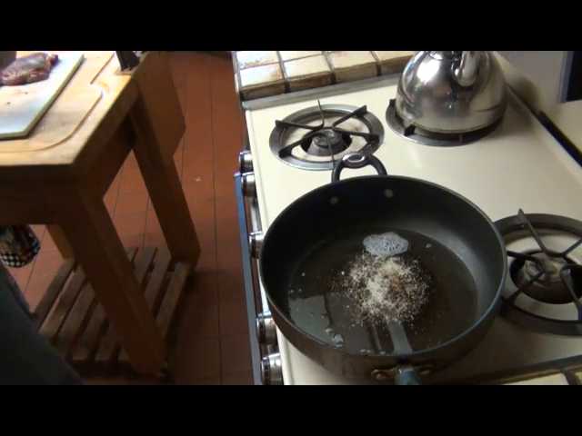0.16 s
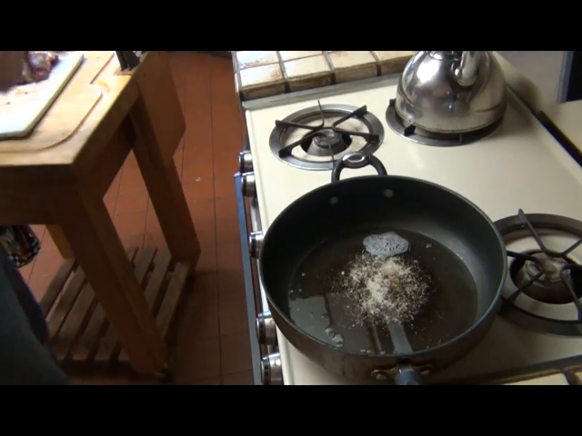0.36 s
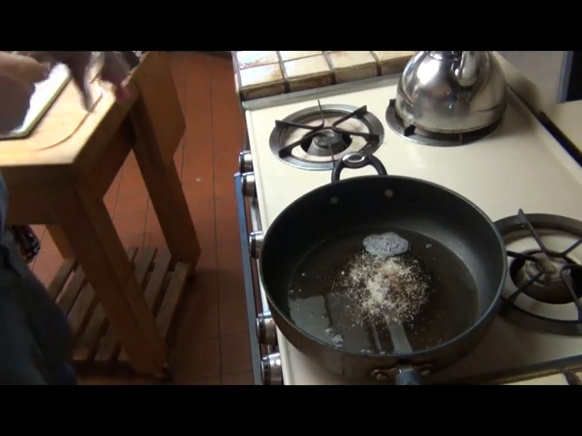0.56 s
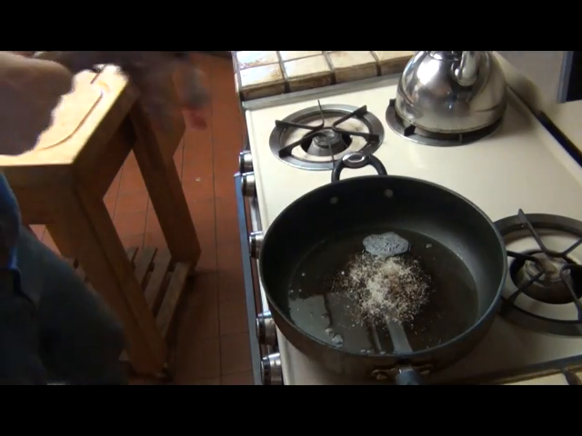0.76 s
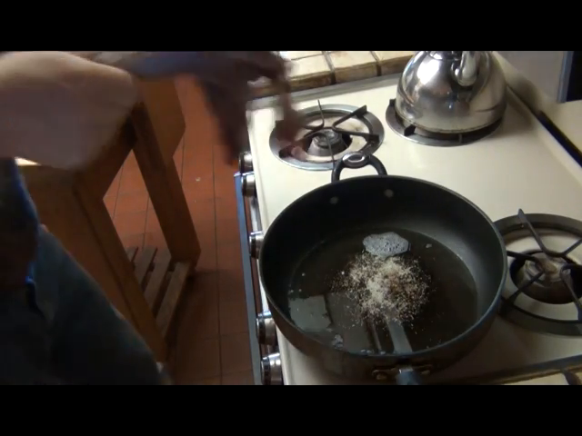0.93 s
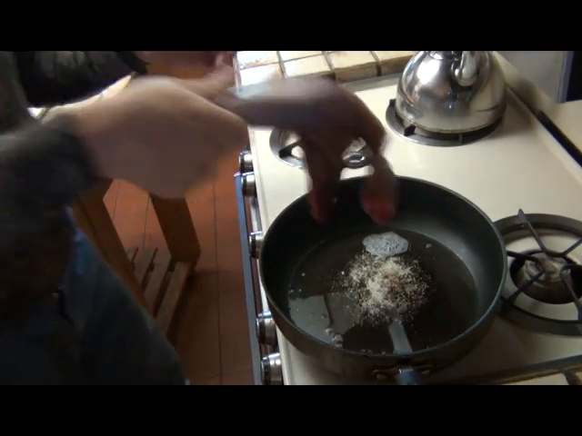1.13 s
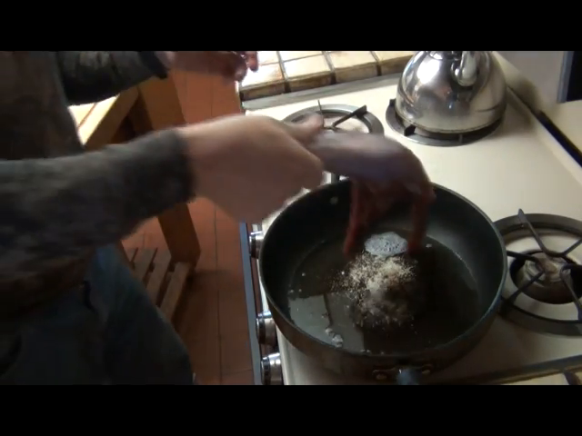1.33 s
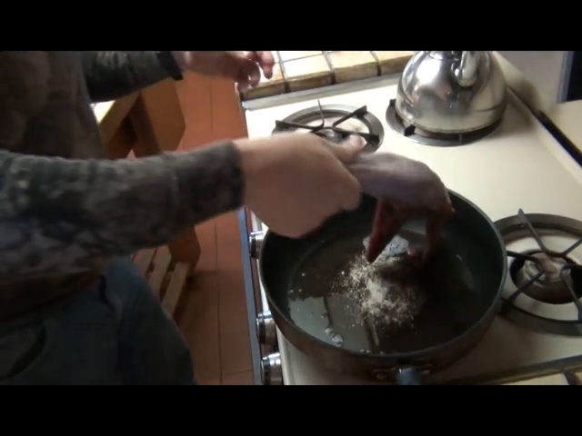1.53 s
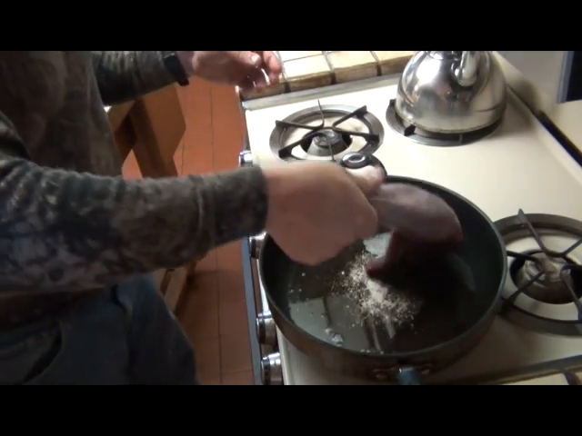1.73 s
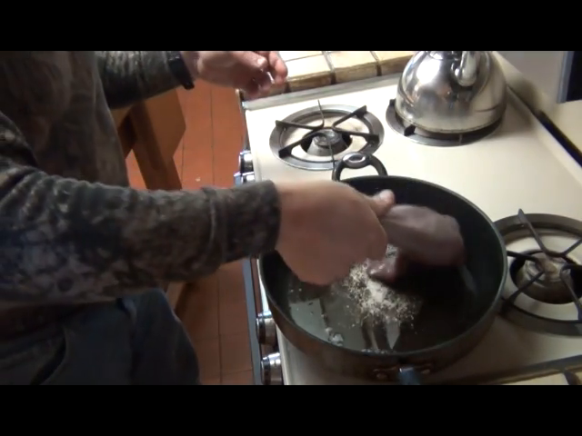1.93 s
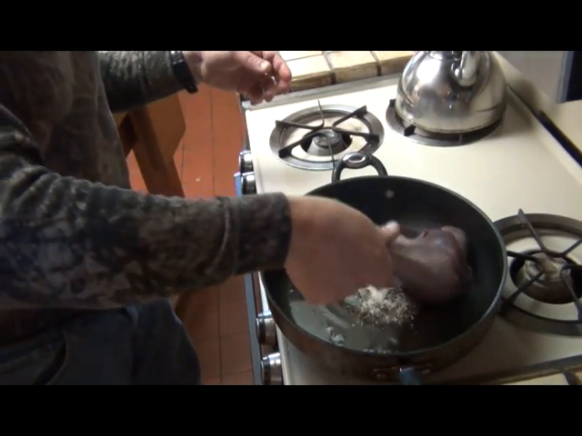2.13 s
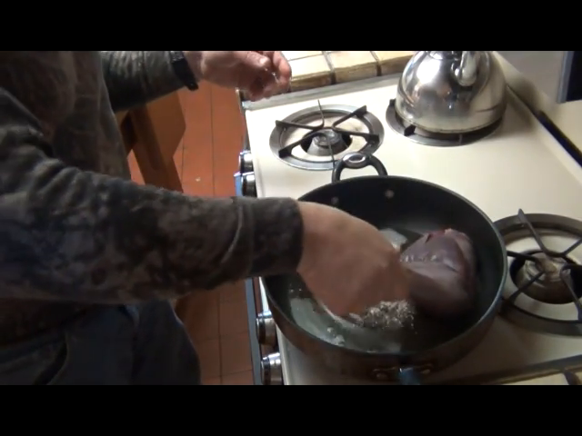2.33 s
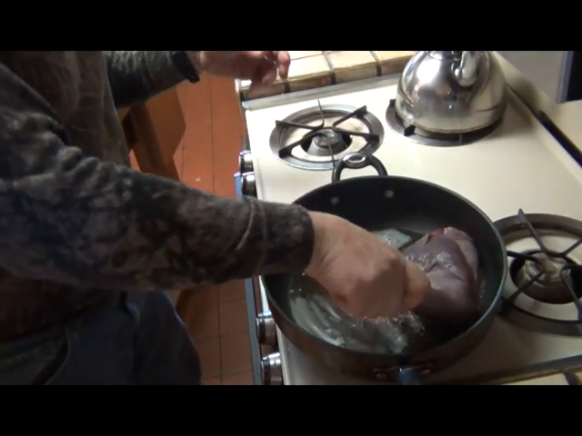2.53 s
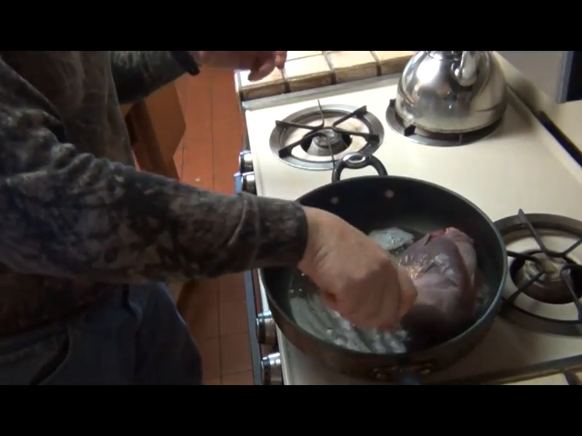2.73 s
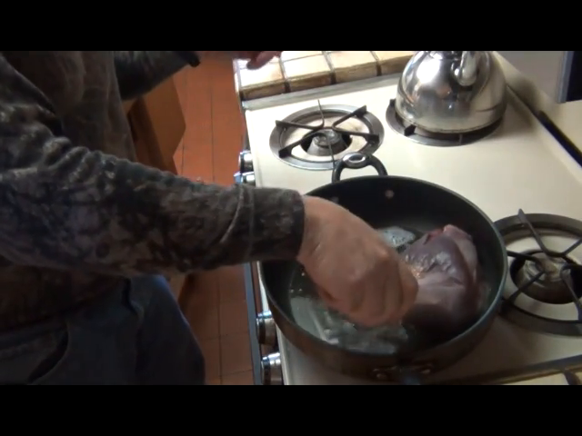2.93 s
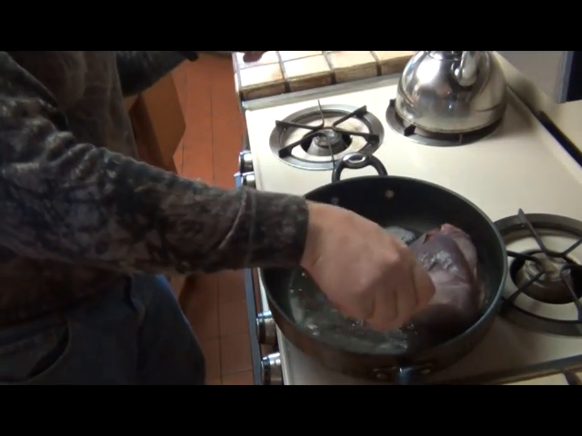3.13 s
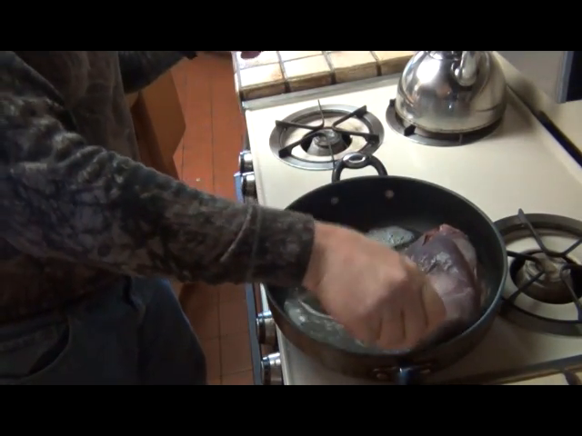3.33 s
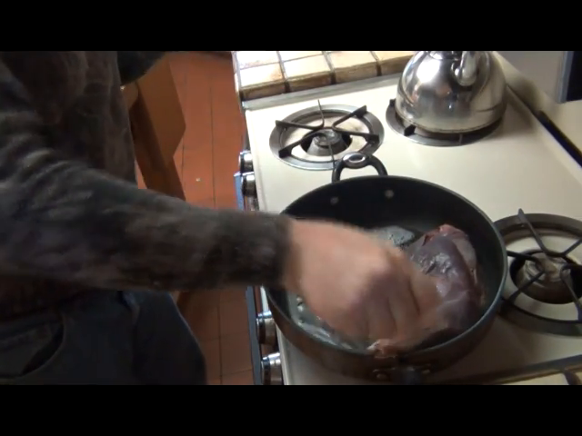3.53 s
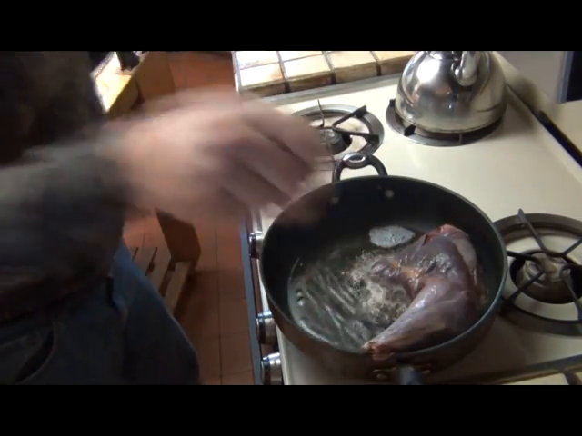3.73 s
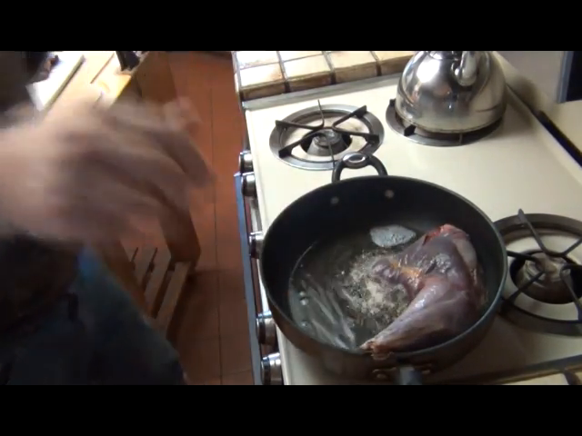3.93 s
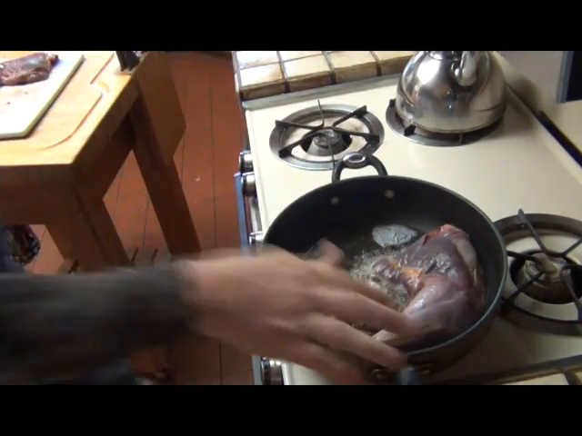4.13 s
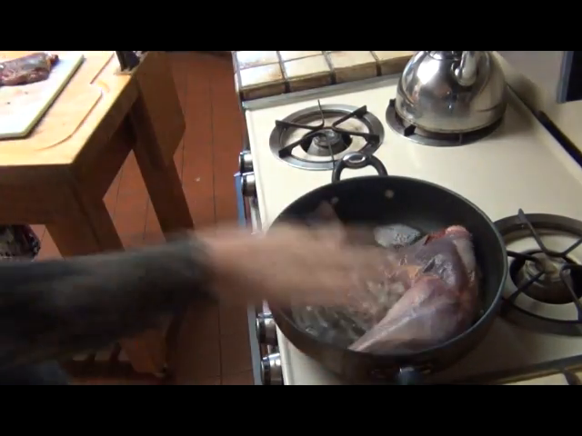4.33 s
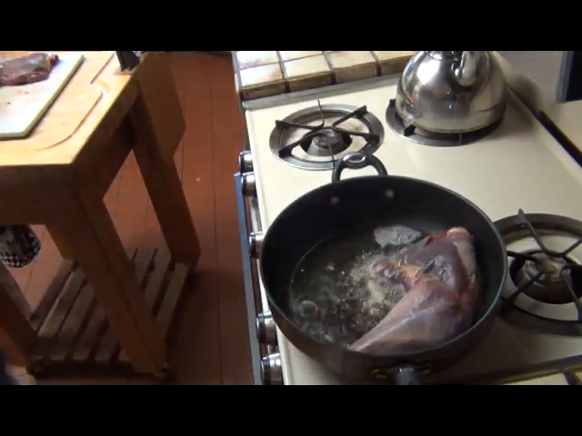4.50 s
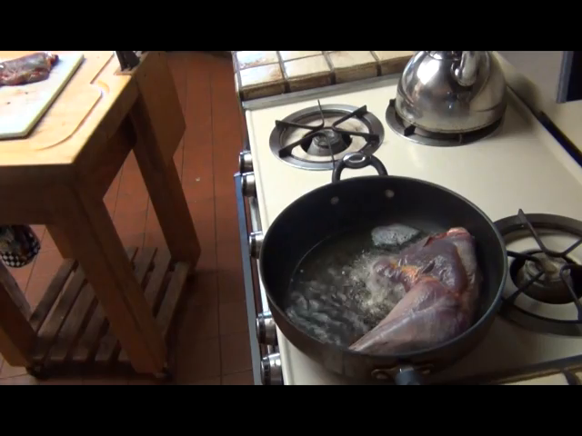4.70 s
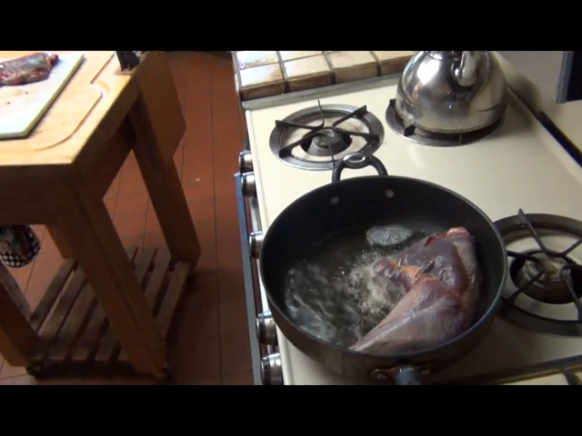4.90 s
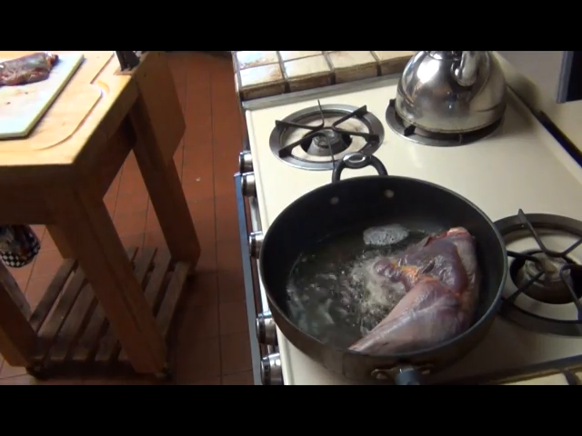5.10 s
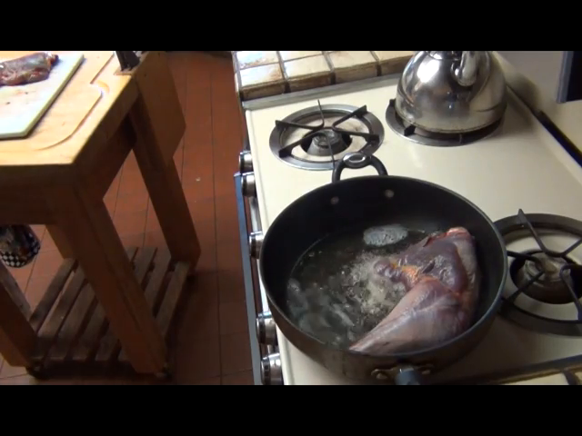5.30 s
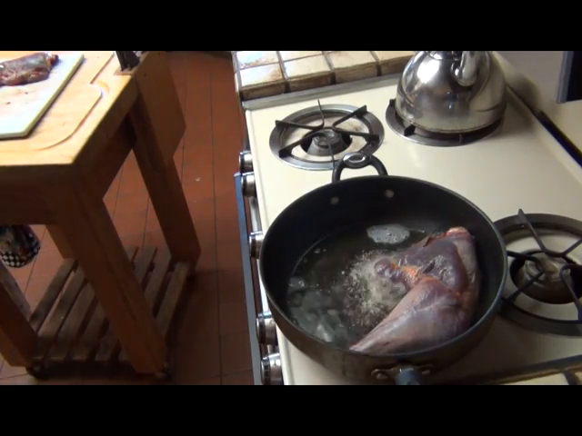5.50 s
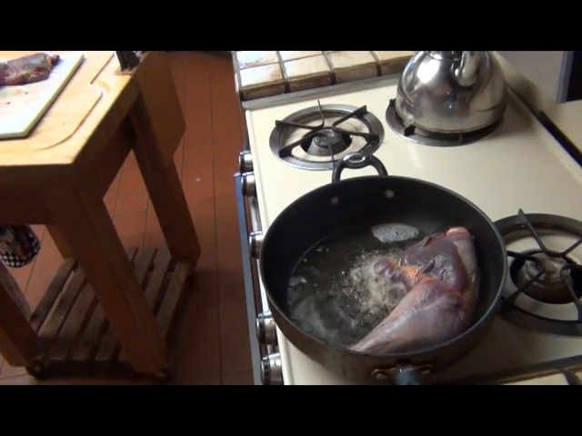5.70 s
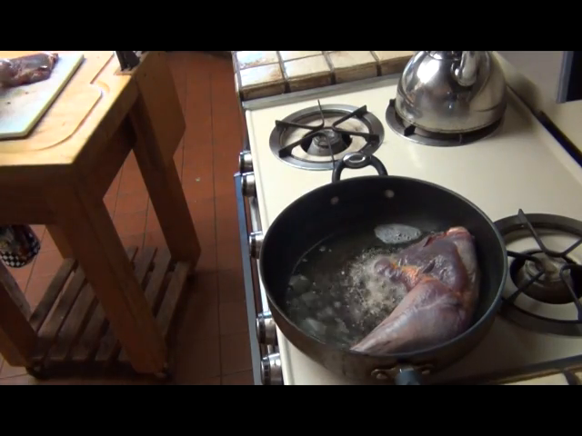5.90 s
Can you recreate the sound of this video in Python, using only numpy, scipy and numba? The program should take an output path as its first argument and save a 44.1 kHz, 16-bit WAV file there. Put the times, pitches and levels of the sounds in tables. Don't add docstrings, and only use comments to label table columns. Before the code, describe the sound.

A quiet kitchen opens with faint room hush and a low fridge hum. A soft knock and sleeve swishes come at the start, with garlic fizzing and bubbling weakly from 0.1 to 0.7 seconds. A longer fine spit at about 1.0 and cloth brushing around 1.0 to 1.3 lead in. From 1.39 to 1.65, sharp wet splats snap and ring the bare steel pan; sizzling swells quickly beneath them and is roaring by 1.7. It stays loud and bright to the end, dense with crackles, upward chirps and tiny spits, its pan ring growing more damped. Hard pops stand out near 2.4, 3.2, 3.8 and 4.3, with dull knocks around 3.8 to 3.9 and 4.3. Surges come near 4.4 and 4.9, bright chirps cluster at 5.0 to 5.3, and the biggest pops and a low thump land around 5.5 to 5.65. Close stereo camera sound, briefly ducking around pops.

```python
import sys
import numpy as np
from scipy import signal
from scipy.fft import rfft, irfft, next_fast_len
from scipy.io import wavfile
from scipy.ndimage import uniform_filter1d, minimum_filter1d
from numba import njit

SR = 44100
rng = np.random.default_rng(int(sys.argv[2]) if len(sys.argv) > 2 else 0)


def gain_from_db(level_db):
    decades = np.asarray(level_db, float) / 20
    return 10 ** decades


def inscribe(sig):
    pcm = np.round(np.clip(np.atleast_2d(sig).T, -1, 1) * 32767)
    wavfile.write(sys.argv[1], SR, pcm.astype(np.int16))


N = 262395


def level(x, db=0):
    return x * gain_from_db(db) / np.sqrt(np.mean(x ** 2))


def shade(table, size):
    hz, db = np.transpose(table)
    return np.interp(np.log(np.arange(size // 2 + 1) * SR / size + 1), np.log(hz), db)


def colour(x, table):
    cep = irfft(np.log(gain_from_db(shade(table, size=4096))))
    cep[1:2048] *= 2
    cep[2049:] = 0
    return signal.oaconvolve(x, irfft(np.exp(rfft(cep))))[:N]


def elliptic(x, order, ripple_db, stop_db, hz, kind="lowpass"):
    return signal.sosfilt(signal.ellip(order, ripple_db, stop_db, hz, kind, fs=SR, output="sos"), x)


def ring(x, hz, t60_s):
    r, turn = np.exp(-np.log(1000) / (t60_s * SR)), 2 * np.pi * hz / SR
    return signal.lfilter([0, r * np.sin(turn)], [1, -2 * r * np.cos(turn), r ** 2], x) * np.sqrt(2 * (1 - r ** 2))


def walk(rate_hz):
    k = int(SR / rate_hz)
    held = np.repeat(rng.standard_normal(N // k + 1), k)
    return 1.2 * uniform_filter1d(uniform_filter1d(held, k), k)[:N]


def crackle(per_s, scatter_db, hiss, flicker_db):
    burst = rng.random(N) < per_s / SR
    size, sign, steam = rng.exponential(size=N), rng.standard_normal(N), rng.standard_normal(N)
    clicks = np.zeros(N)
    clicks[burst] = gain_from_db(scatter_db * np.minimum(size[burst], 5.2)) * np.sign(sign[burst])
    return (level(clicks) + hiss * steam) * gain_from_db(flicker_db * (walk(14) + walk(60)))


def swell(events, rise_s, fall_s):
    t = np.arange(N) / SR
    ramps = []
    for s, db, hold_s in events:
        corners = [s - rise_s, s, s + hold_s, s + hold_s + fall_s]
        ramps.append(db * np.interp(t, corners, [0, 1, 1, 0]))
    return np.max(ramps, axis=0)


def blips(events, cycles, glide, rise_s):
    out, t = np.zeros(N + SR), np.arange(SR // 4) / SR
    for s, db, hz in events:
        age = t * hz / cycles
        tone = np.sin(2 * np.pi * hz * t * (1 + glide * age)) * (1 - np.exp(-t / rise_s))
        out[int(s * SR):][:len(t)] += gain_from_db(db - 60 * age) * tone
    return out[:N]


# Hz, dB per Hz.
KITCHEN = [(12, -37), (20, -26), (86, -9), (122, -2.5), (227, -8.5), (332, -19), (401, -6.5), (617, -17),
           (853, -14), (1180, -11), (1720, -14), (2140, -22.5), (7600, -13), (12700, -34), (16500, -62),
           (22000, -120)]
# Hz, width in Hz, level in dB.
FRIDGE = [(59, 3.9, -72), (117.3, 9.1, -70), (171.3, 26, -68), (265, 55, -66), (871, 62, -59.5)]


def kitchen():
    hush = level(colour(rng.standard_normal(N), KITCHEN), -58)
    return hush + sum(level(ring(rng.standard_normal(N), hz, 3.4 / width), db) for hz, width, db in FRIDGE)


# start in seconds, rise in dB, hold in seconds.
SWISHES = [
    (.012, 18, 0.032),
    (.14, 15.5, 0.037),
    (.57, 7, .01),
    (1.23, 21, 0.11),
]
# Hz, dB.
SLEEVE = [(200, -17), (450, -11), (620, 1), (780, -1), (900, -4), (1200, -9), (1800, -17.5), (4000, -39)]


def sleeve():
    envelope_db = -65.5 + swell(SWISHES, rise_s=0.17, fall_s=0.13)
    return gain_from_db(envelope_db) * level(colour(crackle(1500., 2.9, 1.0, 2.4), SLEEVE))


# start in seconds, peak in dB, top in Hz, t60 in seconds.
KNOCKS = [(0.029, -37.5, 140, 0.12), (1.245, -60, 280, 0.16), (3.788, -32, 1200, 0.027),
          (3.884, -29, 700, 0.037), (4.266, -48, 300, 0.11), (4.283, -37, 600, 0.051),
          (4.305, -35, 500, 0.057), (4.331, -36, 500, 0.11), (4.354, -30, 700, 0.068),
          (4.374, -35, 450, 0.11), (4.549, -60, 300, .06), (1.958, -46, 500, .04), (5.519, -27, 705, 0.11)]


def knocks():
    out, t = np.zeros(N + SR), np.arange(SR // 4) / SR
    for s, db, top_hz, t60_s in KNOCKS:
        band = signal.butter(2, [80, top_hz], "bandpass", fs=SR, output="sos")
        dull = signal.sosfilt(band, rng.standard_normal(len(t)))
        out[int(s * SR):][:len(t)] += level(dull, db) * gain_from_db(-60 * t / t60_s) * (1 - np.exp(-t / 0.0017))
    return out[:N]


# start in seconds, rise in dB, hold in seconds.
SPITS = [
    (.13, 4, 0.046),
    (.33, 8, .04),
    (.43, 7, .02),
    (.5, 6.5, .03),
    (.58, 4, .02),
    (.73, 10, 0.012),
    (.95, 16.5, 0.16),
    (1.16, 10, .04),
]
# Hz, dB.
GARLIC_FIZZ = [(2500, -15), (4500, -15), (6300, -9.5), (7800, 0), (8800, -7), (10500, -18), (13000, -29)]


def garlic_fizz():
    envelope_db = -63.5 + swell(SPITS, rise_s=0.07, fall_s=.04)
    return gain_from_db(envelope_db) * level(colour(crackle(2000., 2.3, 1.4, 0.68), GARLIC_FIZZ))


# start in seconds, rise in dB, hold in seconds.
SIMMERS = [
    (.2, 8.5, 0.43),
]
# Hz, dB.
SIMMER = [(1000, -16), (1800, -9), (2200, -10), (2420, -5), (2620, -11), (2950, -4), (3150, -3.5),
          (3400, -13), (5000, -23.5)]


def garlic_simmer():
    envelope_db = -64.5 + swell(SIMMERS, rise_s=0.18, fall_s=.17)
    return gain_from_db(envelope_db) * level(colour(crackle(1200., 2.0, 1.1, 0.87), SIMMER))


def steel(x, modes, stretch):
    return sum(gain_from_db(db) * ring(x, hz, t60_s * stretch) for hz, db, t60_s in modes)


# start in seconds, peak in dB, pan ring in dB, t60 in seconds, snap in dB.
SPLATS = [(0.4925, -34, -12, 0.03, 0), (.502, -36, -12, .03, 0.1), (0.5776, -37.5, -10, 0.04, 3),
          (1.3923, -9.5, -6, 0.097, -13), (1.405, -12, -2, 0.053, 0), (1.412, -26, 6, 0.069, -15),
          (1.42, -29, 0, 0.24, -20), (1.462, -7, -14, 0.027, -4), (1.468, -8, -8, .025, -17),
          (1.492, -9, -12, 0.03, 4), (1.495, -11, -7, 0.11, 2), (1.529, -16, 4, 0.12, 3),
          (1.568, -17, 0, 0.055, -10), (1.598, -6.5, 3, 0.085, -10), (1.635, -11, 5, .05, -10)]
# Hz, dB, t60 in seconds.
BARE = [(1730, -18, 0.3), (2370, -13, .15), (2660, -11, .05), (2900, -5, .05), (3187, 1.5, 0.066),
        (4100, 4, 0.061), (5040, -6, 0.055), (5850, -14, 0.066), (7460, 4, 0.051), (8300, -15, .04)]
# Hz, dB.
TOUCH = [(1500, -35), (3000, -6), (4200, 2.5), (6000, 4.5), (8000, 5.5), (9500, -13), (13000, -19),
         (15000, -61)]


def splats():
    t, spray = np.arange(N) / SR, level(crackle(5400.0, 2.6, 1.2, 1.1))
    bright, rings, snaps = 0, 0, np.zeros(N)
    for s, db, ring_db, t60_s, snap_db in SPLATS:
        age = np.clip(t - s, 0, 1)
        fade = gain_from_db(db - 11.0 - 60 * age / t60_s) * (1 - np.exp(-age / 0.00084))
        bright = bright + fade
        rings = rings + gain_from_db(ring_db) * fade
        snaps[int(s * SR)] = gain_from_db(db + snap_db + 16.5)
    hiss = colour(bright * spray + snaps * gain_from_db(-8.5), TOUCH) / np.std(colour(spray, TOUCH))
    return hiss + steel(rings * spray, BARE, 1) / np.std(steel(spray, BARE, 1))


# start in seconds, rise in dB, hold in seconds.
BRUSHES = [
    (1.0, 9.5, 0.13),
    (1.21, 12, .04),
]
# Hz, dB.
BRUSH = [(900, -20), (1400, -2), (2200, -1), (2800, -2), (4200, -11), (6000, -17)]


def cloth_brush():
    envelope_db = -65 + swell(BRUSHES, rise_s=0.072, fall_s=.08)
    return gain_from_db(envelope_db) * level(colour(crackle(1200., 2.0, 1.1, 0.87), BRUSH))


# start in seconds, peak in dB, Hz.
HUMS = [
    (1.409, -37, 1704),
    (1.45, -44, 1720),
    (1.533, -15.5, 2370),
    (1.695, -20, 1712),
    (1.765, -28, 1712),
]


def pan_hums():
    return blips(HUMS, cycles=440, glide=0, rise_s=.003)


# time in seconds, vigour in dB, coarseness (shift to large bubbles) in dB.
CONTACT = [(1.449, -38.5, -6), (1.5, -26.5, -1), (1.58, -23, 3), (1.7, -17, 0.5), (1.9, -16, -2),
           (2.3, -19.5, 2.5), (2.6, -18.5, 2.5), (3.1, -19, -1), (3.6, -20, 1.5), (3.85, -18, -2.5),
           (4.45, -18, 0.5), (4.7, -18.5, -0.5), (5.3, -16.5, -3), (5.95, -19.5, -1)]
# time in seconds, rise in dB, length in seconds, coarseness in dB.
SURGES = [(1.658, -2.5, 0.053, 3), (1.807, 6, 0.049, 0), (1.996, 1, 0.038, 1.5), (2.146, 1, 0.083, 1),
          (2.262, 3.5, 0.04, 1), (2.472, 0.5, 0.054, 1.5), (2.573, 3, 0.037, 2.5), (2.811, 3, 0.031, 3.5),
          (2.969, 2, 0.047, 2), (3.213, -0.5, 0.048, 2.5), (3.293, 7, 0.064, 1), (3.61, 1, 0.09, 3),
          (3.729, 4, 0.036, 3), (3.913, 1.5, 0.099, 3.5), (4.073, 5, 0.043, 0), (4.365, 9, 0.033, -2),
          (4.455, 8, 0.076, -2), (4.634, 2, 0.054, 0.5), (4.886, 7, 0.074, -0.5), (4.99, 0, 0.026, 3),
          (5.1, 0, .05, 2), (5.296, 3, 0.083, 2), (5.526, 5, 0.03, 4.5), (5.61, 0, .04, 2.5),
          (5.73, 0.5, 0.042, 1.5), (5.826, 13, 0.023, 1.5)]
# time in seconds, change in dB.
LULLS = [(1.55, -2), (1.73, 0), (1.82, -4), (1.91, -4.5), (2.03, -5.5), (2.09, -3), (2.384, -5), (2.7, 0.5),
         (2.921, -4), (3.04, -1.5), (3.15, 2), (3.24, 1.5), (3.33, -3), (3.82, -0.5), (4.01, -1.5),
         (4.28, 4), (4.5, -2.5), (4.691, -4.5), (4.79, -3), (4.931, -5), (5.05, -2), (5.22, -3.5),
         (5.455, -3.5), (5.56, 0.5), (5.65, 3)]


def boiling():
    lull_s, lull_coarse = 0.021, 0.64
    t = np.arange(0, N, 32) / SR
    when, vigour, coarse = np.transpose(CONTACT)
    vigour, coarse = np.interp(t, when, vigour, left=-90), np.interp(t, when, coarse)
    lulls = [(s, db, lull_s, lull_coarse * db) for s, db in LULLS]
    for s, db, length_s, coarse_db in SURGES + lulls:
        bump = np.exp(-(2 * (t - s) / length_s) ** 2)
        vigour, coarse = vigour + db * bump, coarse + coarse_db * bump
    forming = -15 * np.exp(-(np.maximum(t - when[0], 0) / 0.5) ** 2)
    layers = vigour, vigour - 7.5 + coarse, vigour - 19 + coarse + forming
    return [np.interp(np.arange(N) / SR, t, db) for db in layers]


# Hz, dB.
BUBBLE = [(1000, -12.5), (1600, -6), (2400, -5.5), (3400, -8.5), (4200, -6.5), (6000, 1), (7800, 4),
          (9500, -6.5)]


def bubbles(cycles, per_cycle):
    hz, db = np.transpose(BUBBLE)
    out = 0
    for f in np.geomspace(hz[0], hz[-1], num=16):
        out = out + gain_from_db(np.interp(f, hz, db)) * ring(crackle(per_cycle * f, 2.6, 0.38, 2.1), f, cycles / f)
    return out


# Hz, dB per Hz.
FIZZ = [(1470, -33), (2500, -6), (3350, -14.5), (4230, -2), (4810, -9.5), (5300, -4), (7900, 4.5),
        (8450, 1), (10000, -19), (12000, -23.5), (13700, -23), (14400, -32), (15100, -19)]
# Hz, dB.
SPRAY = [(7000, -39), (9500, 3), (11500, 9), (13500, -8), (14500, -21), (15500, -56)]
# Hz, dB.
BOIL = [(500, -27), (1000, -5), (1600, -0.5), (2500, 1), (3300, -3.5), (4500, -8), (7000, -29.5)]
# Hz, dB, t60 in seconds.
PAN = [(443, -5, 0.05), (458, -6, 0.046), (598, -14, 0.22), (618.6, -7.5, 0.13), (945, -3, 0.35),
       (1703, 5.5, 0.057), (2370, 9.5, 0.16), (3125, 10, 0.019), (4130, 11, 0.0081), (5030, -14, .016)]
# Hz, dB.
RINGING = [(900, -32), (1500, 3), (3200, -3.5), (5200, 6.5), (7000, -26.5)]
# Hz, dB.
DEEP = [(200, -16), (330, -40), (420, -9.5), (700, 2), (1100, -8), (1500, -8.5), (2500, -20.5)]
# time in seconds, dB.
FREE = [(1.5, 6), (1.7, -3), (1.9, -4.5), (2.3, -7.5), (3.0, -6.5), (3.35, -7), (3.6, -13), (5.95, -21)]


def sizzle():
    t = np.arange(N) / SR
    fizz_db, boil_db, deep_db = boiling()
    free_db = np.interp(t, *np.transpose(FREE))
    spray, sung = crackle(2500., 3.53, 0.9, 0.81), bubbles(24.2, .03)
    high = signal.sosfilt(signal.butter(4, 3500, "highpass", fs=SR, output="sos"), sung)
    low = signal.sosfilt(signal.butter(4, 3500, "lowpass", fs=SR, output="sos"), sung)

    airborne = level(colour(crackle(570.0, 1.7, 0.34, 2.5), SPRAY), -21.5)
    fizz = level(level(colour(spray, FIZZ)) + airborne + level(high, -5.5))

    bursts = 0.64 * level(spray) + level(crackle(900., 3.75, 1.0, 0.39))
    pan_stretch, loaded_stretch, sag_hz = 1.4, 1.2, 44.5
    load = np.interp(t, (1.8, 2.12), [0, 1])
    loaded = [(hz - sag_hz, db, t60_s) for hz, db, t60_s in PAN]
    rung = steel(np.sqrt(1 - load) * bursts, PAN, pan_stretch)
    rung = rung + steel(np.sqrt(load) * bursts, loaded, loaded_stretch)
    boil = level(level(colour(bursts, BOIL)) + level(low, -7.0))
    boil = (boil + gain_from_db(free_db) * level(colour(rung, RINGING))) / np.sqrt(1 + gain_from_db(2 * free_db))

    pockets = 0.42 * level(bursts) + level(crackle(300., 2.25, 0.64, 1.0))
    pocket_ring = level(colour(steel(pockets, PAN, pan_stretch), DEEP))
    deep = level(level(colour(pockets, DEEP)) + gain_from_db(7.5) * pocket_ring)
    return gain_from_db(fizz_db) * fizz + gain_from_db(boil_db) * boil + gain_from_db(deep_db) * deep


# start in seconds, peak in dB, Hz.
BLOOPS = [(1.5323, -4.5, 2370), (1.6361, -6, 2660), (1.643, -13, 2380), (1.655, -8, 2400),
          (1.664, -11, 2280), (1.7603, -9, 1700), (1.9598, -12, 2780), (2.118, -11, 1650),
          (2.128, -14, 1780), (2.16, -17, 1660), (2.195, -14, 1640), (2.232, -11, 1640), (2.2464, -8, 1660),
          (2.265, -9, 1670), (2.43, -16, 1630), (2.4924, -7.5, 1655), (2.465, -14, 2440), (2.49, -9, 2380),
          (2.642, -13.5, 1580), (2.733, -10.5, 1665), (2.795, -13, 1620), (2.896, -14, 1590),
          (2.9417, -9, 2840), (3.0, -14, 1680), (3.215, -13, 1610), (3.29, -14, 1590), (2.7351, -12, 2370),
          (2.7984, -19, 2100), (2.8812, -13.5, 2420), (3.0898, -15, 1690), (3.3392, -16, 1620),
          (3.7233, -9, 1970), (4.0351, -8, 3080), (4.734, -16, 2550), (4.84, -9, 1770), (4.984, -16, 2030),
          (5.319, -5, 1700), (5.324, -9, 2580), (5.5227, -8, 2040), (5.8036, -18, 2090)]


def large_bubbles():
    return blips(BLOOPS, cycles=58, glide=0.021, rise_s=0.0012)


# start in seconds, peak in dB.
DROPLETS = [(1.5663, -31), (1.5803, -27), (1.655, -19), (1.681, -23), (1.8477, -18), (1.9095, -16),
            (1.9509, -25), (1.9838, -20), (2.0587, -23), (2.1031, -20), (2.3984, -26), (2.4618, -24),
            (2.5411, -23), (2.795, -29), (2.9177, -27), (2.9282, -18), (3.0639, -22), (3.1113, -26),
            (3.1238, -23), (3.3936, -21), (3.6999, -22), (3.8321, -15), (3.8636, -19), (3.914, -22),
            (3.9793, -20), (4.0691, -16), (4.2208, -16), (4.4358, -19), (4.549, -14), (4.6897, -25),
            (4.8433, -22), (5.067, -17), (5.2195, -26), (5.2345, -22), (5.3552, -23), (5.4545, -24),
            (5.6271, -19), (5.7318, -19), (5.7907, -17), (5.8835, -21)]
# Hz, dB.
DROPLET = [(5000, -40), (9000, -16), (11000, 7), (13000, 8), (14500, -14), (15500, -30)]


def droplets():
    t, (when, db) = np.arange(N) / SR, np.transpose(DROPLETS)
    last = np.maximum(np.searchsorted(when, t) - 1, 0)
    age, air = t - when[last], rng.standard_normal(N)
    fade = (age > 0) * gain_from_db(db[last] - 4 - 60 * np.abs(age) / .004)
    return colour(air * fade, DROPLET) / np.std(colour(air, DROPLET))


# start in seconds, peak in dB, Hz.
TICKS = [(1.5718, -12, 3180), (1.612, -12, 2960), (1.6007, -16, 3930), (1.6616, -8, 4060),
         (2.3859, -8, 4320), (2.5466, -9, 4020), (3.0903, -10, 3840), (3.227, -8, 4170),
         (3.7892, -12, 4330), (3.915, -7, 4070), (4.0357, -5, 3400), (4.8204, -15, 4300),
         (4.8778, -16, 4100), (4.9945, -8, 3580), (4.995, -8, 4100), (5.016, -10, 3600), (5.087, -9, 3620),
         (5.1147, -9, 3530), (5.139, -7, 4050), (5.1846, -11, 3600), (5.2, -8, 4100), (5.2325, -10, 3570),
         (5.259, -9, 3600), (4.3455, -15, 2670), (3.5827, -26, 3000), (5.4584, -14, 4230),
         (5.4974, -5, 3590), (5.5218, -8, 4330), (5.5597, -6, 4100), (5.6904, -9, 3570)]


def small_bubbles():
    return blips(TICKS, cycles=42, glide=0.019, rise_s=0.00046)


# start in seconds, peak in dB, Hz.
THUMPS = [
    (1.68, -29.5, 614),
    (2.392, -34, 610),
    (3.782, -35, 410),
    (3.886, -25, 426),
    (4.812, -31, 460),
    (4.954, -29.5, 446),
    (5.52, -17, 586),
    (5.688, -37, 266),
    (5.739, -28, 570),
]


def thumps():
    return blips(THUMPS, cycles=21, glide=0.07, rise_s=0.0013)


# start in seconds, length in seconds.
TOP_OPENINGS = [(1.78, .03), (1.97, .045), (2.15, 0.041), (2.45, .035), (3.49, .03), (3.75, .05), (3.83, .025),
                (3.956, .03), (4.025, .035), (4.09, .155), (4.395, .1), (4.535, .035), (4.8, .045), (5.285, .03),
                (5.49, .09), (5.81, .045), (5.93, .03)]


def top_band(pan):
    t, top_hz, early_top_hz = np.arange(N) / SR, 14300, 13400
    opening = uniform_filter1d(sum(1. * (t > s) * (t < s + length_s) for s, length_s in TOP_OPENINGS), size=300)
    top = elliptic(pan, 8, .2, 60, top_hz, "highpass")
    pan = elliptic(pan, 8, .2, 60, top_hz) + gain_from_db(-1) * opening * top
    opened = np.interp(t, (1.55, 1.68), [0, 1])
    early = signal.sosfiltfilt(signal.ellip(6, .1, 30, early_top_hz, fs=SR, output="sos"), pan)
    return opened * pan + (1 - opened) * early


LIMIT_DB = -5
# start in seconds, dB over the limiter.
POPS = [(2.0068, 8), (2.3756, 15.5), (3.034, 7.5), (3.2337, 19.5), (3.317, 14), (3.8193, 15), (3.8921, 16),
        (4.316, 14.5), (4.495, 9), (4.6563, 14.5), (4.687, 9), (5.2, 11.5), (5.4373, 12), (5.543, 22),
        (5.6445, 22), (5.833, 6)]


def pops():
    click, hits = np.zeros(N), np.zeros(N)
    click[0] = 1
    for s, over_db in POPS:
        hits[int(s * SR) - 6] = gain_from_db(LIMIT_DB + over_db - 8.0)
    return colour(hits, FIZZ) / np.abs(colour(click, FIZZ)).max()


def crack():
    age = np.arange(N) / SR - 2.931
    return np.diff(rng.standard_normal(N + 1)) * (age > 0) * gain_from_db(-23 - 60 * np.abs(age) / .006)


# Hz, dB.
RIM = [(120, -39), (250, -11.5), (400, -3.5), (13500, 1.5), (14300, -9), (15500, -7)]
# Hz, left minus right in dB.
LEAN = [(100, 11), (250, -3.5), (500, -1.5), (1200, 0.35), (2300, -1), (4300, -3), (8000, -2.4),
        (13000, -1)]
# Hz, side in dB.
WIDTH = [(30, -6), (100, 6), (300, -16), (700, -19), (1100, -25), (1800, -43.5), (2400, -16), (4500, -22),
         (8000, -17.5), (11000, -13.5), (14000, -21)]


def scene():
    frying = sizzle() + splats() + pops()
    pan = colour(frying + large_bubbles() + small_bubbles() + pan_hums(), RIM)
    pan = top_band(pan + thumps() + knocks() + droplets())
    around = elliptic(garlic_simmer() + cloth_brush() + sleeve() + kitchen(), 8, .2, 50, 12850)
    tail = rng.standard_normal(2048) * np.exp(-np.arange(2048) / 300.0)
    walls = signal.fftconvolve(pan + .5 * around, tail / np.linalg.norm(tail))[:N]
    scatter = gain_from_db(-1) * walk(500) * pan
    side = colour(gain_from_db(-4.5) * walls + scatter, WIDTH) + gain_from_db(-18.5) * around
    pan = pan + crack() + garlic_fizz()
    size = next_fast_len(N)
    lean = gain_from_db(shade(LEAN, size) / 2)
    left, right = (irfft(rfft(pan, size) * gain, size)[:N] + around for gain in (lean, 1 / lean))
    return np.array([left + side, right - side])


@njit
def duck(peak, top, slope, release):
    gain, g = np.empty(len(peak)), 1.
    for i in range(len(peak)):
        want = min(1., (top / (peak[i] + 1e-9)) ** slope)
        g = want if want < g else g + (want - g) * release
        gain[i] = g
    return gain


def roll_off(x):
    return signal.sosfilt(signal.butter(12, 15230, fs=SR, output="sos"), x)


def record(dry):
    ahead_s, release_s, ratio = 0.0033, 0.011, 12.
    ahead = int(ahead_s * SR)
    peak = -minimum_filter1d(-np.abs(dry).max(axis=0), 2 * ahead)
    gain = duck(peak, gain_from_db(LIMIT_DB), 1 - 1 / ratio, 1 / (release_s * SR))
    out = dry * uniform_filter1d(gain, ahead)
    band = signal.butter(1, [20, 120], "bandpass", fs=SR, output="sos")
    rumble = signal.sosfilt(band, np.clip(np.abs(out[1]) - .33, 0, 1) ** 2)
    return roll_off(out + gain_from_db(6.5) * rumble * np.array([[1], [-1]]))


dry = scene()
out = record(dry)
inscribe(out)
```